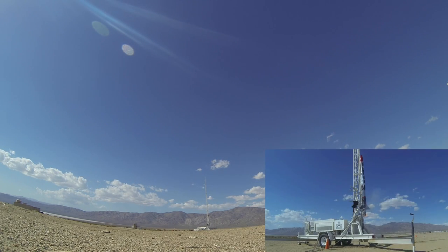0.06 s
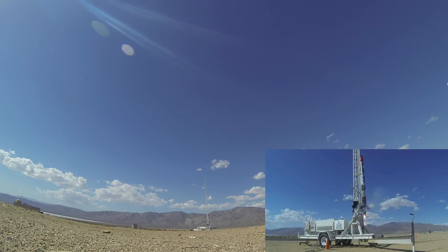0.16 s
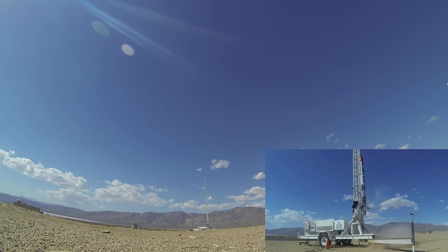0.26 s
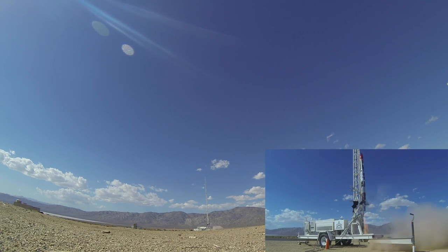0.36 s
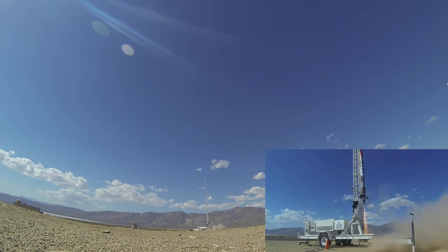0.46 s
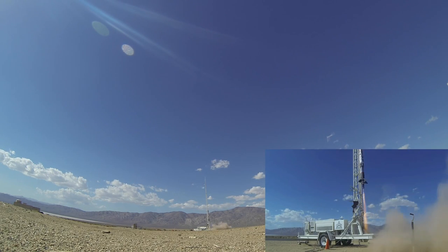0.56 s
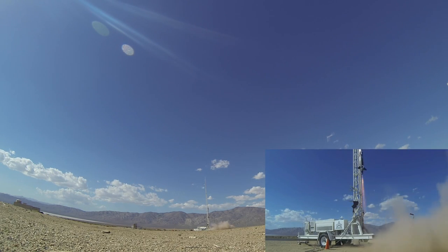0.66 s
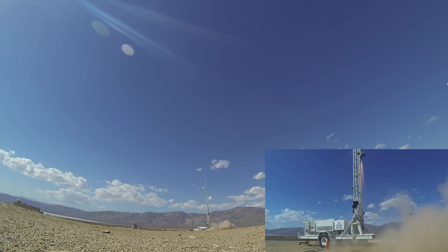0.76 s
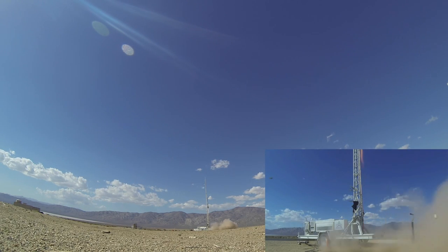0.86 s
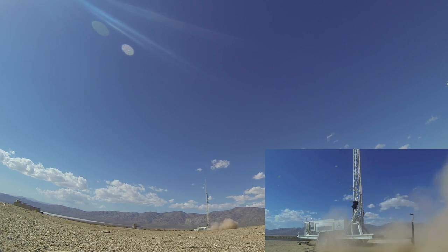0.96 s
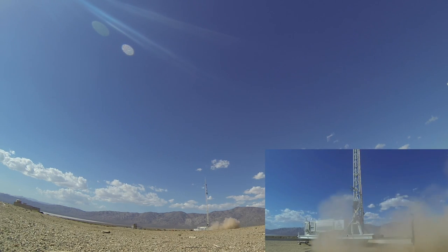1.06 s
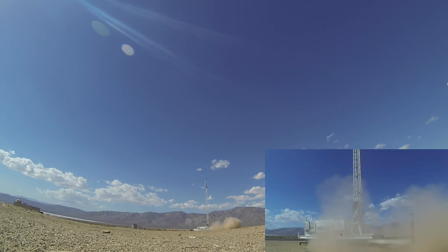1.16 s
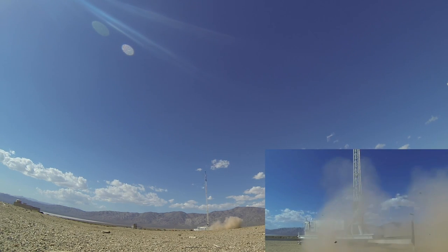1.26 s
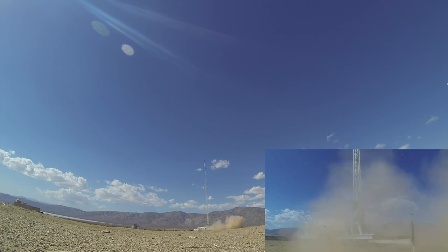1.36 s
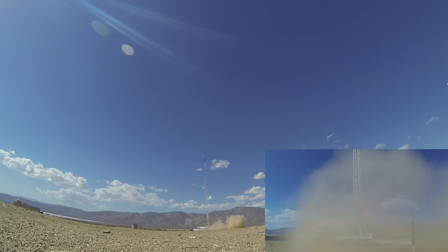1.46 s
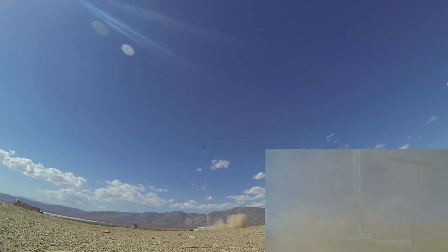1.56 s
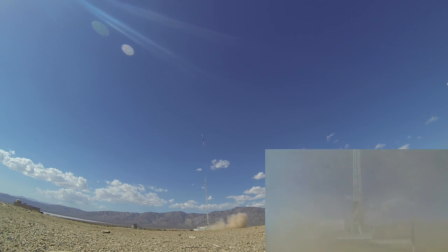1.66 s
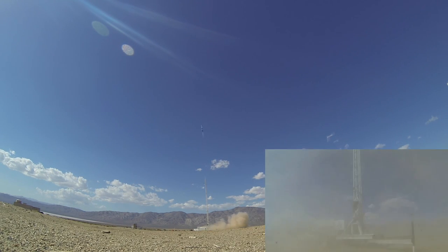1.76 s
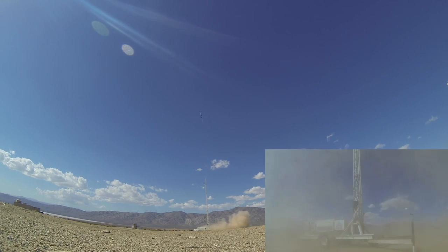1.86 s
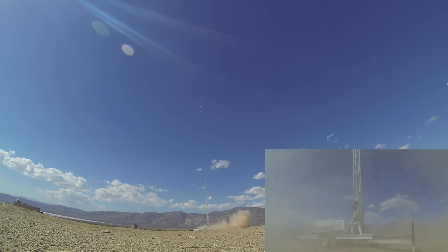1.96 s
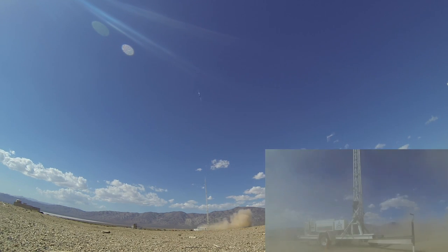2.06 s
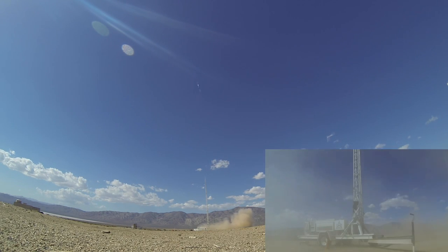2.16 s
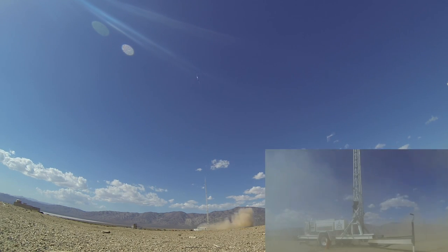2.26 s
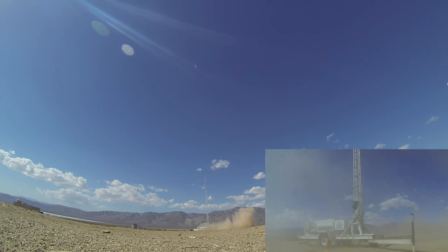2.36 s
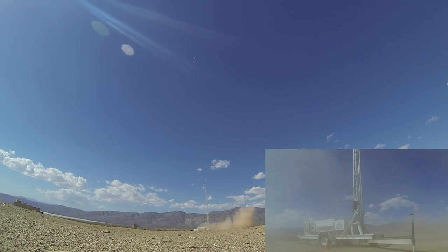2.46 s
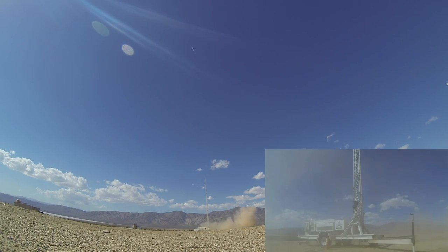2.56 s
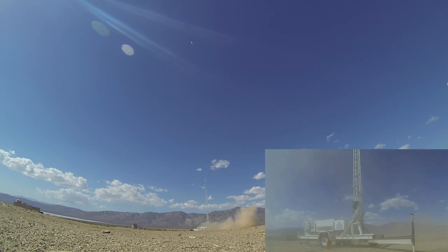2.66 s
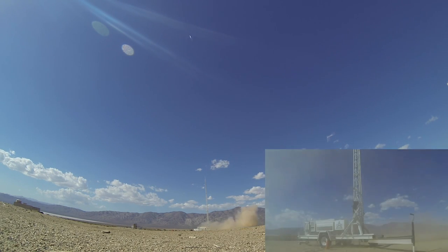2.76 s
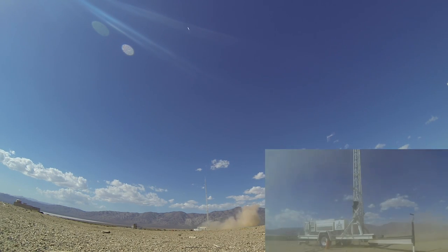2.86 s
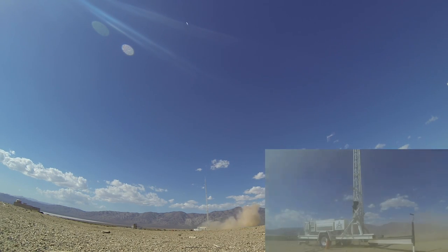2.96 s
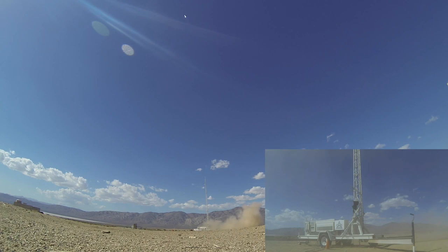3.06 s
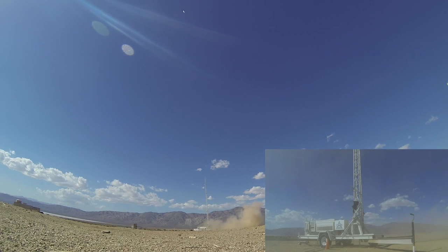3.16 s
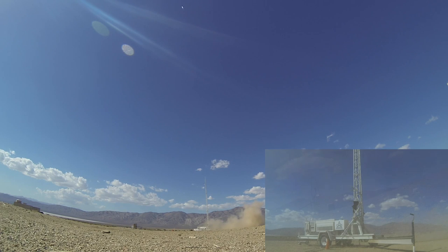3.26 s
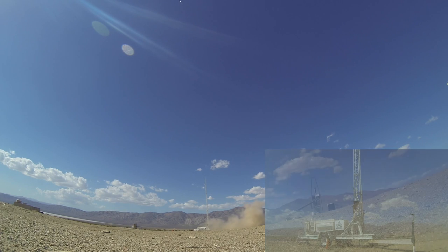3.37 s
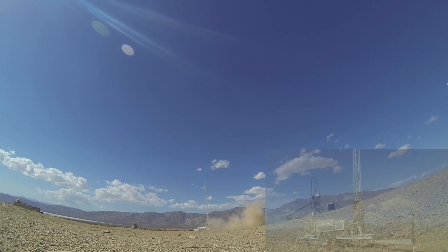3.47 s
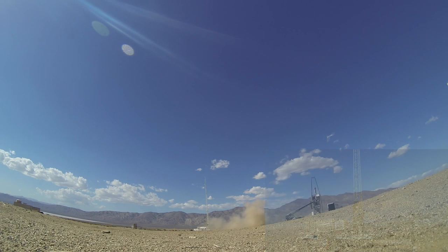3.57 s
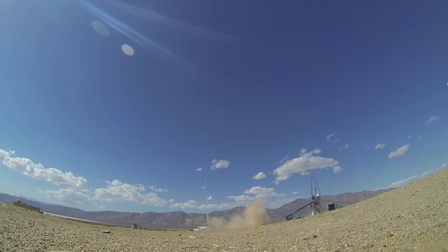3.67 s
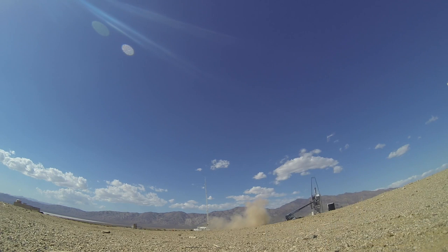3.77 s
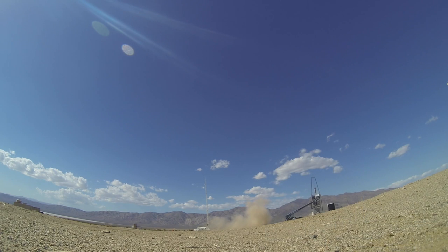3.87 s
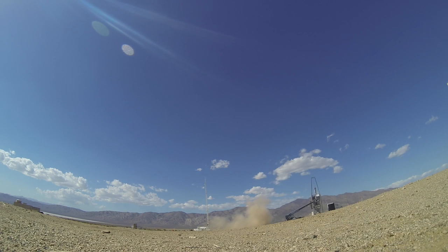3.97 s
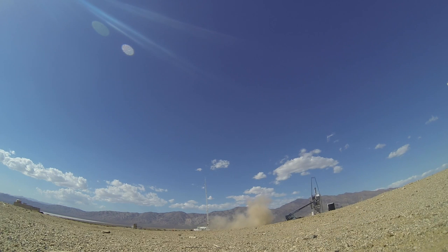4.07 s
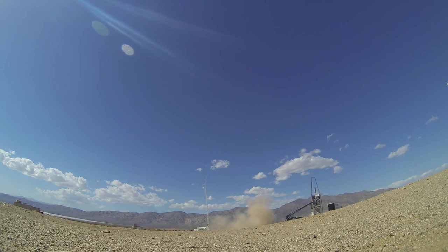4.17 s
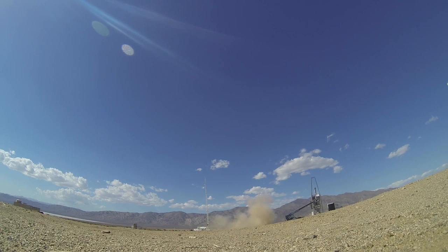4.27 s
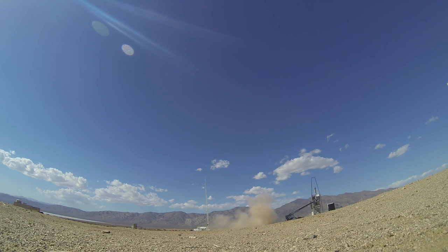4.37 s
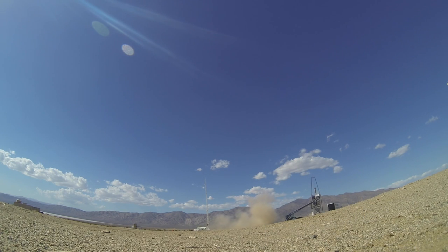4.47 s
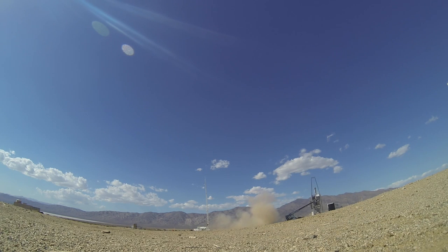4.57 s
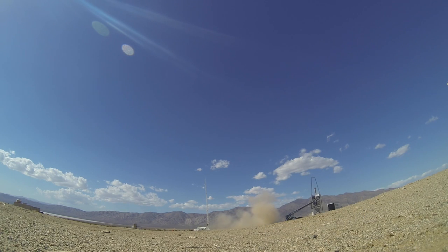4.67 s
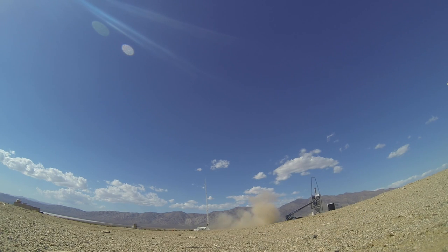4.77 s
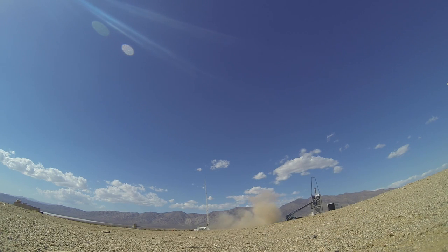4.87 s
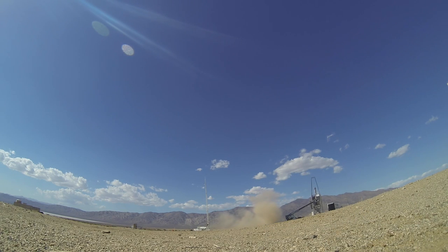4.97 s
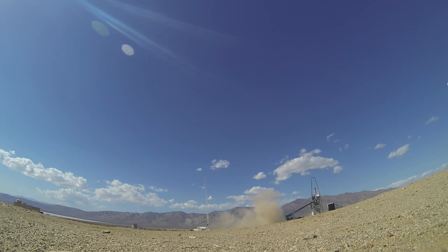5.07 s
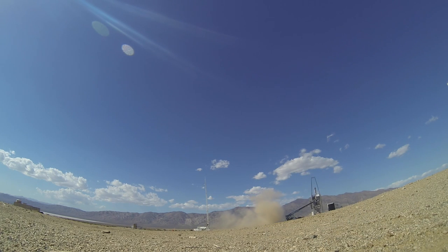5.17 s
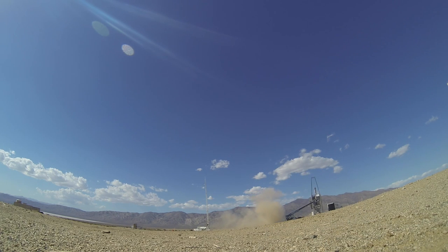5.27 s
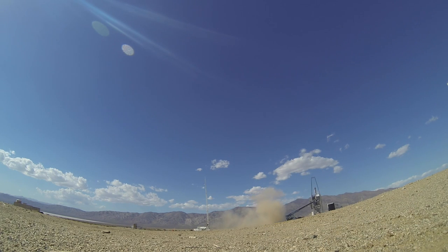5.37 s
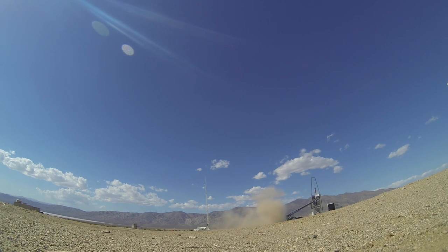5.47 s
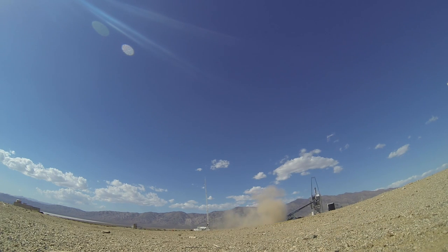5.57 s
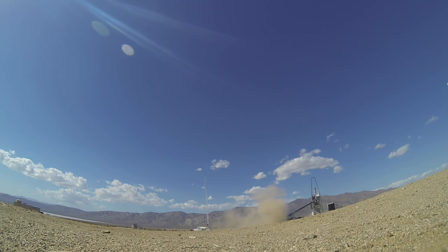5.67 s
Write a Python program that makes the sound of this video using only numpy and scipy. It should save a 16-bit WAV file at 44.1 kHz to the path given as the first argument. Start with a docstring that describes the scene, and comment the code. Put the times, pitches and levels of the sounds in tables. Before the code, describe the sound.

Outdoors on an open desert pad, a camera microphone on the ground catches a brief hush of wind, hiss and thin whine. A tick and faint puff precede several rapid ignition blasts. A loud, crackling, boxy rocket roar opens at once, brightens at lift-off, then recedes in surges, growing duller and more rumbling before dropping away.

```python
"""A small liquid-fuel rocket leaves a desert pad, heard by a camera microphone on the ground.
Light wind, hiss and a faint electronic whine come first, then a dry tick and a faint puff of propellant.
Blasts (pressure humps, thuds and rings) open a crackling jet: shaped noise ringing in the camera's housing.
A boom and a hollow rush come off the pad; the roar flares at lift-off and fades in surges.
With distance the hiss dies and the rumble grows; late on, a second path sweeps a hollow down the roar."""
import sys
import numpy as np
from scipy import signal
from scipy.fft import rfft, irfft
from scipy.io import wavfile
from scipy.ndimage import uniform_filter1d, map_coordinates

SR = 44100
rng = np.random.default_rng(int(sys.argv[2]) if len(sys.argv) > 2 else 0)


def unload_wav(signal):
    """Save mono or channel-first audio to the path in sys.argv[1] as 16-bit WAV at rate SR, clipped to [-1, 1]."""
    wavfile.write(
        sys.argv[1],
        SR,
        np.round(np.clip(np.atleast_2d(signal).T, -1, 1) * 32767).astype(np.int16),
    )


N = 252252
TIME = np.arange(N) / SR  # s
FREQ = np.maximum(np.arange(N // 2 + 1) * SR / N, 1)  # Hz

# spectrum of light wind and the camera's own hiss, relative levels: (frequency [Hz], level [dB])
AIR_SPECTRUM = [(20, -77), (50, -74), (150, -82), (400, -89), (1000, -97.5), (1600, -100), (2300, -105),
                (3100, -103), (4400, -111), (8000, -116), (11000, -117), (12200, -126), (15000, -128)]
# narrow bands of electronic hiss on the same scale: (centre [Hz], width [Hz], level [dB])
HISS_BANDS = [(5120, 120, -99), (10200, 450, -106), (10800, 200, -105), (13300, 600, -117)]
# electronic whine, rms before the background's own rise and fall: (frequency [Hz], level [dB])
WHINE_TONES = [(10644, -73), (10691, -81.5), (13189, -88.5)]
# gain of the background, which sinks and returns: (time [s], gain [dB])
BACKGROUND_GAIN = [(0.4, 4.5), (0.9, -8.5), (2.5, -11), (3.2, -5), (4.1, 4.5)]

# broad spectrum of the housing, relative levels:
# (frequency [Hz], along the ground [dB], slanting [dB], from overhead [dB])
HOUSING_SLOPE = [(25, -67.5, -83, -76.5), (79.6, -60.5, -65, -62.5), (193, -65, -62.5, -60.5),
                 (430, -63, -58.5, -63.5), (770, -64, -64, -67.5), (1130, -53, -61, -62),
                 (2000, -65.5, -78, -71.5), (2670, -63.5, -78, -85), (3420, -75.5, -79, -82),
                 (4250, -86, -91.5, -100), (5600, -90.5, -93, -104), (6860, -88, -103, -112),
                 (10000, -101, -111, -121), (13000, -111, -122, -135), (15000, -128, -138, -145)]
# resonances of the housing on the same scale:
# (centre [Hz], width [Hz], along the ground [dB], slanting [dB], from overhead [dB])
HOUSING_MODES = [(568.7, 37, -60, -63, -61.5), (877, 40.4, -52, -58, -53.5), (970, 125, -53.5, -57.5, -57),
                 (1207, 62, -49.5, -58.5, -71), (1333.7, 97, -39, -45.5, -49.5),
                 (1525.5, 113, -51, -46.5, -42.5), (1621, 110, -44, -49.5, -46),
                 (1678.6, 98, -43.5, -50.5, -51), (2109, 89, -50.5, -56.5, -60.5),
                 (2250, 120, -52, -60, -65.5), (2466, 150, -62.5, -60.5, -65.5), (2796, 210, -57, -80, -71),
                 (3108, 130, -59.5, -58.5, -78.5), (3350, 130, -64, -66.5, -74),
                 (3560, 300, -55.5, -75, -71.5), (3904, 220, -64.5, -80, -78), (4394, 150, -73, -80, -92.5),
                 (4670, 120, -67.5, -76.5, -89.5), (4980, 450, -73, -81, -94),
                 (5590, 490, -86.5, -94.5, -103), (6280, 650, -85.5, -96, -102),
                 (7560, 450, -85.5, -99, -109), (8450, 420, -101, -98, -116),
                 (11300, 440, -100, -111, -125)]
# paths around the housing cancel (below 0 dB) or reinforce (above 0 dB):
# (centre [Hz], width [Hz], along the ground [dB], slanting [dB], from overhead [dB])
HOUSING_PATHS = [(1395, 50, 3, -11.5, -8.5), (1790, 64, 4, -8.5, -9), (2490, 98, -11.5, -2, 3.5),
                 (2577, 170, 2.5, -3, -5.5), (2835, 68, -23, -3.5, 1.5), (2980, 150, 5, 4.5, -11),
                 (3480, 72, -14, 4.5, 5), (3820, 80, -3, -12, -3), (4140, 64, -14, 3, 0.5),
                 (4270, 130, 4.5, -8, -8), (4730, 110, -16.5, -2.5, -1.5)]
# angle of arrival: (time [s], angle [0 along the ground, 1 slanting, 2 from overhead])
ARRIVAL = [(1.3, 0.0097), (1.8, 0.21), (2.15, 1.16), (2.7, 1.08), (3.1, 1.72), (3.7, 1.73)]

# large eddies far down the plume, at full thrust: (time [s], low roar [dB], rumble [dB])
PLUME_LEVELS = [(0.5, -30, -32.5), (0.62, -24, -37.5), (0.9, -29.5, -42.5), (1.05, -28.5, -44),
                (1.25, -33, -51), (1.9, -28.5, -52.5), (2.15, -30, -46.5), (3.15, -29.5, -40),
                (3.9, -33.5, -35), (4.4, -28, -38), (4.95, -33, -39.5), (5.7, -40.5, -38.5)]
# roar, bite, rasp, edge and hiss of the jet, one row each:
# (level on the pad [dB], flare [dB], fade with climb [dB/s], sudden late drop [dB])
JET_VOICES = [(-21, 4, 1.19, 5.5), (-32, 8, 3.5, 4), (-41, 11, 4, 1.5), (-54.5, 15.5, 4.5, 6),
              (-62.5, 18.5, 6, 3)]
# swells and brief dropouts of the jet: (time [s], half length [s], roar [dB], treble [dB])
JET_SURGES = [(0.426, 0.028, 4, 1), (0.757, 0.11, 3, 6.5), (1.324, 0.031, 0, 3.5),
              (1.936, 0.052, -3.5, -4.5), (2.004, 0.016, -0.5, 2.5), (2.294, 0.053, 0, 2),
              (2.395, 0.027, -2.5, -9), (2.526, 0.067, 0, 3), (3.21, 0.13, 2, 7), (3.45, 0.078, 0.6, 10),
              (3.563, 0.13, 0, -5), (3.872, 0.17, 0.2, 6), (4.088, 0.06, 4.5, 2.5), (4.451, 0.068, 6, 10.5),
              (4.623, 0.062, 6, 9.5), (5.347, 0.1, 6.2, 7.5)]
# strong bursts of crackle, rise before smoothing: (time [s], rise [dB])
CRACKLE_BURSTS = [(0.401, 6), (0.828, 6), (2.191, 9), (3.444, 6), (3.572, 9), (3.771, 9), (3.814, 7),
                  (5.342, 8)]
# ignition blasts: (time [s], peak [dB], half length [s], thud at onset [dB], housing ring at onset [dB])
IGNITION_BLASTS = [(0.3224, -20, 0.0028, -29, -19.5), (0.3602, -9.5, 0.0051, -23, -23),
                   (0.4503, -10, 0.0013, -12, -22), (0.4590, -12.5, 0.0018, -27, -16.5),
                   (0.5320, -15, 0.0039, -28, -35), (0.5383, -9, 0.0012, -13.5, -16)]

# the faint puff of propellant, relative to full thrust
PUFF_S, PUFF_LENGTH_S, PUFF_DB = 0.19, 0.05, -46
# full thrust builds up just after the igniter pops
LIGHT_S, THRUST_RISE_S = 0.3297, 0.027
# the jet flares up as the flame clears the pad, then turns away and recedes
CLEAR_S, FLARE_RISE_S, FLARE_FALL_S = 1.206, 0.2, 1.02
# the second path far up, its strength relative to the first, and the hollow that it cuts
PATH_S, PATH_OPEN_S, PATH_SHARE = 4.59, 0.16, 0.093
HOLLOW_HZ, SINK_OCT_PER_S = 2870, 1.94
# far up, the roar drops suddenly and then dwindles
FALL_S, FALL_LENGTH_S, DWINDLE_DB_PER_S = 4.774, 0.086, 4.5


def undb(db):
    """Decibels to gain."""
    return 10 ** (np.asarray(db) / 20)


def unit(x):
    """Scale to rms 1."""
    return x / np.sqrt(np.mean(x ** 2))


def curves(rows):
    """Each column of a table, joined by straight lines in time."""
    s, *columns = np.transpose(rows)
    return [np.interp(TIME, s, column) for column in columns]


def walk(rate):
    """Random levels held 1 / rate s, then smoothed twice; spread 1."""
    hold = max(int(SR / rate), 1)
    held = np.repeat(rng.standard_normal(N // hold + 1), hold)
    smooth = uniform_filter1d(uniform_filter1d(held, hold), hold)
    return unit(smooth[:N])


def fade(start_s, length_s):
    """A sudden start and an exponential decay."""
    return (TIME >= start_s) * np.exp(-np.clip((TIME - start_s) / length_s, 0, 20))


def settle(start_s, length_s):
    """An exponential approach from 0 to 1."""
    return 1 - np.exp(-np.maximum(TIME - start_s, 0) / length_s)


def swell(centre_s, half_s):
    """A smooth rise and fall, 1 at its centre."""
    return np.exp(-np.minimum(((TIME - centre_s) / half_s) ** 2, 100))


def bell(centre_hz, width_hz):
    """A bell over frequency, 1 at its centre and half at its edges."""
    return .5 ** np.minimum((2 * (FREQ - centre_hz) / width_hz) ** 2, 100)


def below(hz, order):
    """Gain of a low-pass."""
    return 1 / np.sqrt(1 + (FREQ / hz) ** (2 * order))


def above(hz, order):
    """Gain of a high-pass."""
    return 1 / np.sqrt(1 + (hz / FREQ) ** (2 * order))


def response(slope, modes, paths):
    """Causal filter: bell-shaped resonances on a broad spectrum, with narrow dips and peaks."""
    hz, db = np.transpose(slope)
    power = undb(np.interp(np.log(FREQ), np.log(hz), db)) ** 2
    power = power + sum(undb(peak_db) ** 2 * bell(centre, width) for centre, width, peak_db in modes)
    gain = np.sqrt(power) * undb(sum(db * bell(centre, width) for centre, width, db in paths))
    # folding the cepstrum gives minimum phase: the ring follows its cause
    cepstrum = irfft(np.log(gain), N)
    cepstrum[1:N // 2] *= 2
    cepstrum[N // 2 + 1:] = 0
    return np.exp(rfft(cepstrum))


def noise(colour, envelope=1):
    """Noise that follows an rms envelope and then rings in a filter."""
    ringing = irfft(rfft(envelope * rng.standard_normal(N)) * colour, N)
    return ringing / np.sqrt(np.mean(np.abs(colour) ** 2))


def background(air_db=-58):
    """Light wind rumbles on the case; the camera's electronics hiss and whine."""
    air = noise(response(AIR_SPECTRUM, HISS_BANDS, paths=[]), undb(air_db))
    whine = 0
    for hz, db in WHINE_TONES:
        cycles = np.cumsum(hz + 4 * walk(rate=30)) / SR  # the pitch wanders by 4 Hz rms
        whine = whine + undb(db) * np.sqrt(2) * np.sin(2 * np.pi * cycles)
    gain_db, = curves(BACKGROUND_GAIN)
    return (air + whine) * undb(gain_db)


def tick(tick_s=0.168, tick_db=-51, ring_s=0.0025):
    """A faint, dry tick just before the engine lights: a short decay of noise around 2900 Hz."""
    return noise(bell(2900, 600), undb(tick_db) * fade(tick_s, ring_s))


def thrust():
    """A faint puff of propellant, then the engine comes up to full thrust."""
    puff = undb(PUFF_DB) * swell(PUFF_S, PUFF_LENGTH_S)
    return puff + settle(LIGHT_S, THRUST_RISE_S)


def housing():
    """The housing around the microphone rings differently for each of three angles of arrival."""
    return [response([(hz, db[k]) for hz, *db in HOUSING_SLOPE],
                     [(hz, width, db[k]) for hz, width, *db in HOUSING_MODES],
                     [(hz, width, db[k]) for hz, width, *db in HOUSING_PATHS])
            for k in range(3)]


def turbulence(shock_rate=700, scatter_db=3, crackle_db=-3):
    """Smooth mixing noise plus small shocks (shock_rate per second) of very unequal strength."""
    strikes = rng.random(N) < shock_rate / SR
    shocks = strikes * undb(scatter_db * np.minimum(rng.exponential(size=N), 3))
    crackle = unit(shocks - shocks.mean())
    return unit(rng.standard_normal(N) + undb(crackle_db) * crackle)


def flight():
    """Level in dB of each voice: a flare at lift-off, a fade with distance (treble fastest) and surges."""
    climb_s = np.maximum(TIME - CLEAR_S, 0)
    flare = np.exp(np.minimum(TIME - CLEAR_S, 0) / FLARE_RISE_S - climb_s / FLARE_FALL_S)
    fall = settle(FALL_S, FALL_LENGTH_S)
    dwindle_db = DWINDLE_DB_PER_S * np.maximum(TIME - FALL_S, 0)
    roar = sum(db * swell(s, half_s) for s, half_s, db, _ in JET_SURGES)
    treble = sum(db * swell(s, half_s) for s, half_s, _, db in JET_SURGES)
    surges = [roar, (roar + treble) / 2, treble, treble, treble]
    return [pad_db + flare_db * flare - fade_db * climb_s - fall_db * fall - dwindle_db + surge
            for (pad_db, flare_db, fade_db, fall_db), surge in zip(JET_VOICES, surges)]


def jet(angles, flutter_db=0.25, surge_db=0.5, burst_s=0.005, sputter_db=3.0, waver_db=1.5):
    """The exhaust: fluttering turbulence, from big slow eddies to fine hiss, coloured by its angle of arrival."""
    roar_db, bite_db, rasp_db, edge_db, hiss_db = flight()
    low_db, rumble_db = curves(PLUME_LEVELS)
    angle, = curves(ARRIVAL)
    flutter = unit(undb(flutter_db * walk(rate=150) + surge_db * walk(rate=25)))
    bursts_db = uniform_filter1d(sum(db * fade(s, burst_s) for s, db in CRACKLE_BURSTS), size=64)
    # once the rocket is aloft, moving air makes the shortest waves come and go
    air_db = settle(CLEAR_S, 0.14) * (sputter_db * walk(rate=51) + waver_db * walk(rate=18))
    # small eddies sound high, large ones low
    eddies = [(above(21, order=2) * below(195, order=4), rumble_db),
              (above(216, order=4) * below(853, order=12), low_db),
              (above(780, order=12) * below(2037, order=24), roar_db + bursts_db),
              (above(1800, order=24) * below(2770, order=24), bite_db + bursts_db / 2 + air_db / 4),
              (above(2805, order=24) * below(4450, order=24), rasp_db + air_db / 3),
              (above(3940, order=24) * below(5450, order=16), edge_db + air_db / 2),
              (above(5760, order=16), hiss_db + air_db)]
    out = 0
    for k, colour in enumerate(angles):
        # neighbouring angles crossfade at equal power
        share = np.sqrt(np.clip(1 - np.abs(np.clip(angle, 0, 2) - k), 0, 1))
        spectrum = colour * rfft(flutter * turbulence())
        voices = sum(undb(db) * unit(irfft(spectrum * band, N)) for band, db in eddies)
        out = out + share * voices
    return out * thrust()


def ignition(colour, thud_s=0.0091, ring_s=0.0014):
    """Uneven first burning: each blast is a pressure hump between two suctions, a dull thud and a housing ring."""
    humps = thuds = rings = 0
    for s, peak_db, half_s, thud_db, ring_db in IGNITION_BLASTS:
        u = (TIME - s) / half_s * np.sqrt(np.pi / 2)
        humps = humps + undb(peak_db) * (1 - 2 * u ** 2) * np.exp(-u ** 2)
        front_s = s - 1.53 * half_s  # the leading suction arrives ahead of the peak
        thuds = thuds + undb(thud_db) * fade(front_s, thud_s)
        rings = rings + undb(ring_db) * fade(front_s, ring_s)
    thud = noise(above(100, order=2) * below(550, order=5), thuds)
    ring = noise(colour * below(2900, order=8), rings)
    return humps + thud + ring


def pad_wash(colour, boom_db=-25, boom_start_s=0.35, boom_s=0.077, wash_db=-18, wash_s=0.657, spread_s=0.034):
    """The flame hits the ground: a deep boom dies away, then a hollow rush swells and fades."""
    boom = noise(above(32, order=2) * below(130, order=4), undb(boom_db) * fade(boom_start_s, boom_s))
    rush = undb(wash_db + 2 * walk(rate=50)) * swell(wash_s, spread_s)
    return boom + noise(colour * above(550, order=4) * below(980, order=12), rush)


def two_paths(x):
    """The distant roar arrives twice and partly cancels where the lag is half a cycle: a hollow sweeps down."""
    hollow_hz = HOLLOW_HZ * 2 ** (-SINK_OCT_PER_S * np.maximum(TIME - PATH_S, 0))
    strength = PATH_SHARE * settle(PATH_S, PATH_OPEN_S)
    late = map_coordinates(x, [(TIME - 0.5 / hollow_hz) * SR], order=3, mode="mirror")
    return (x + strength * late) / np.sqrt(1 + strength ** 2)


def scene():
    """Ignition and jet through the housing, over the quiet desert."""
    angles = housing()
    ground = angles[0]
    rocket = two_paths(jet(angles)) + ignition(ground) + pad_wash(ground)
    return (background() + tick() + rocket)[None]


def record(dry, ceiling=.8, cut_hz=15250):
    """The camera rounds the highest peaks and cuts the top; the sound ends without a click."""
    rounded = dry / (1 + (dry / ceiling) ** 6) ** (1 / 6)
    ending = np.minimum((TIME[-1] - TIME) / 0.006, 1)
    top_cut = signal.ellip(8, .2, 80, cut_hz, fs=SR, output="sos")
    return signal.sosfilt(top_cut, rounded * ending)


dry = scene()
out = record(dry)
unload_wav(out)
```